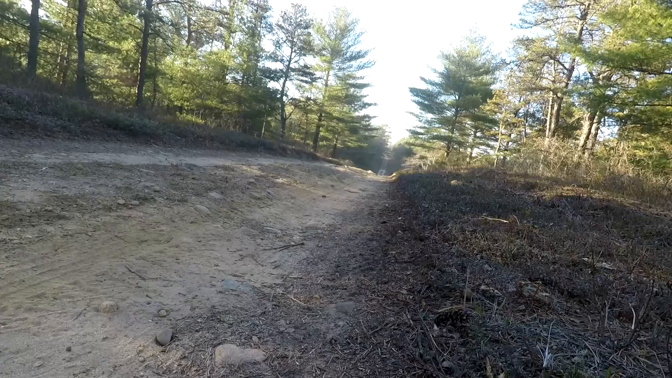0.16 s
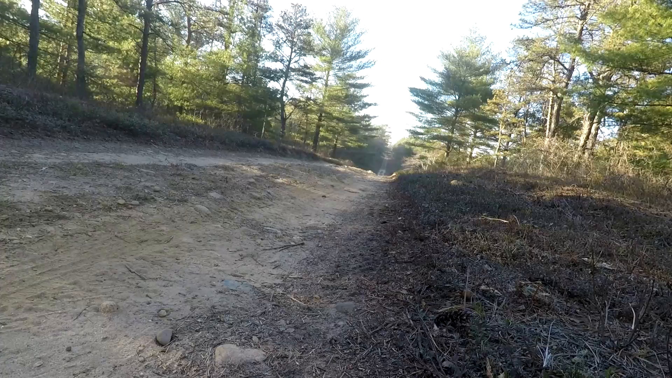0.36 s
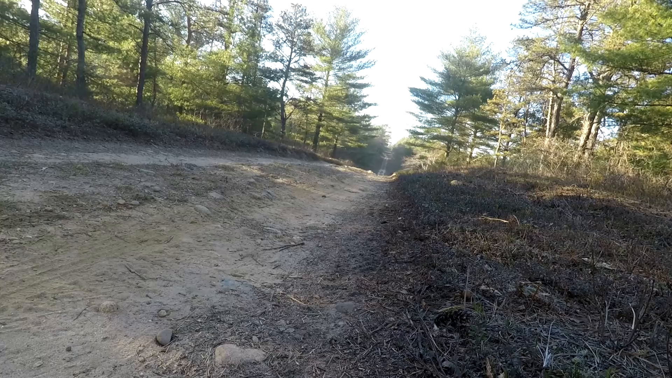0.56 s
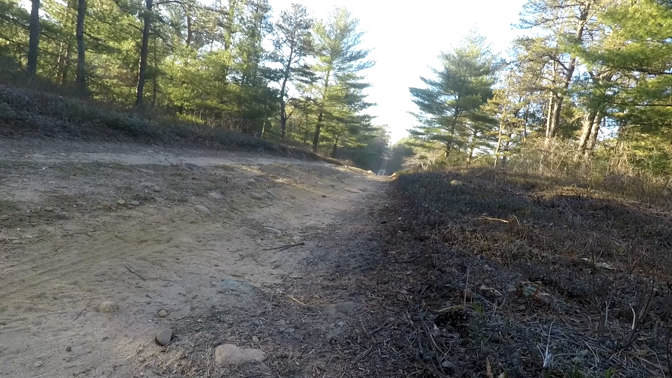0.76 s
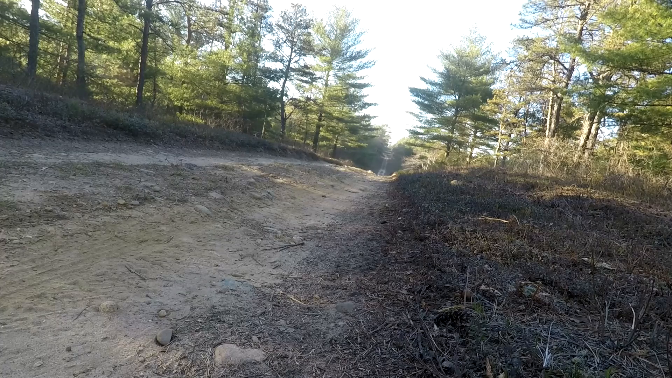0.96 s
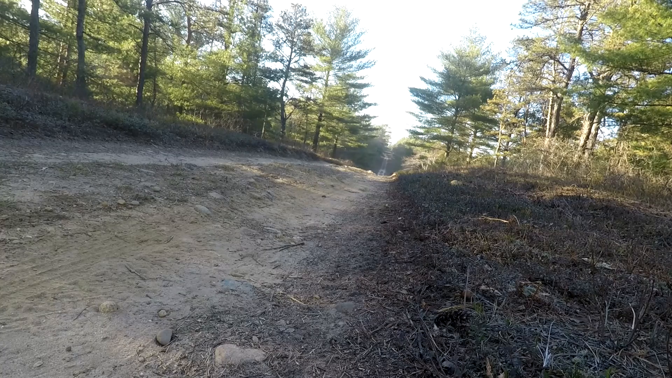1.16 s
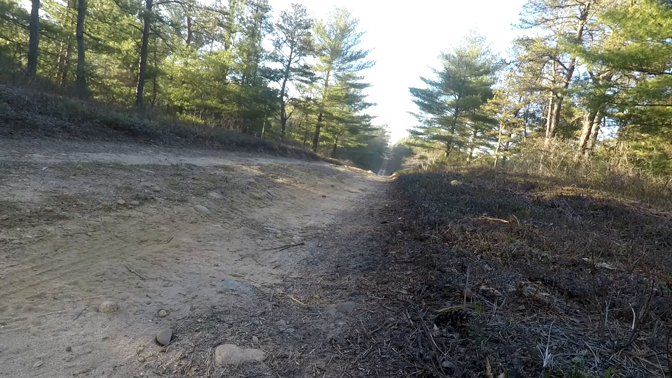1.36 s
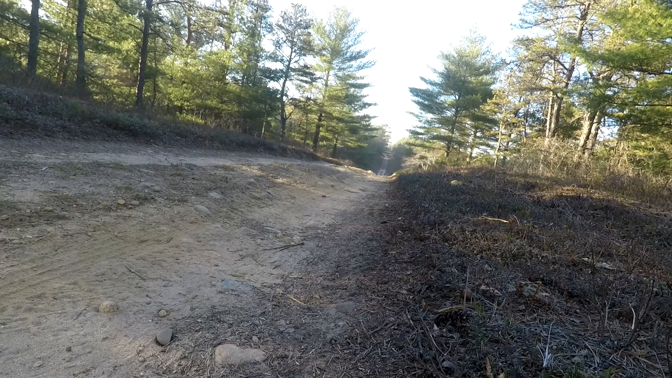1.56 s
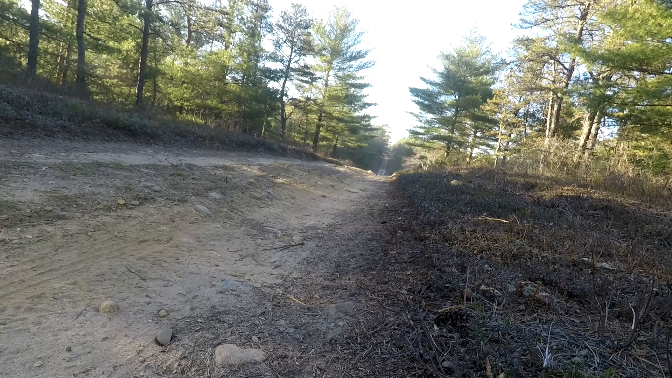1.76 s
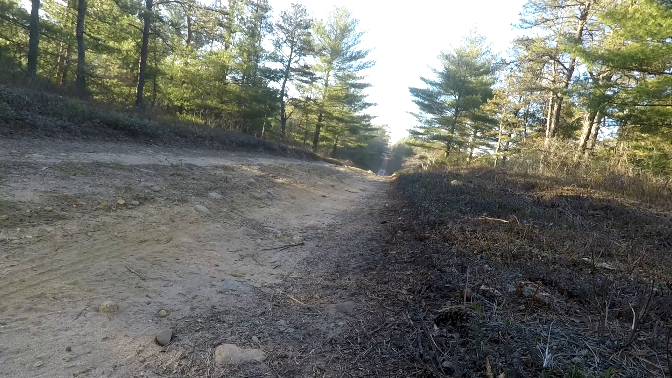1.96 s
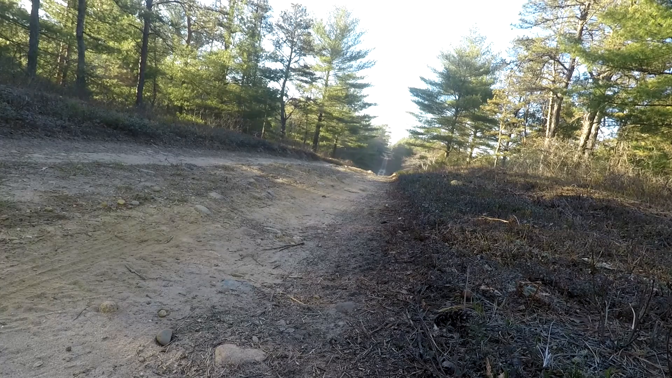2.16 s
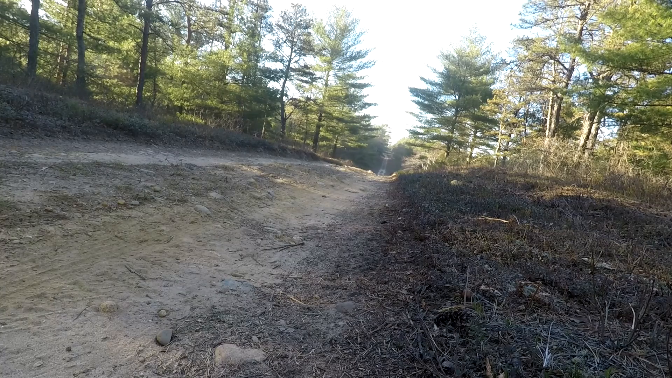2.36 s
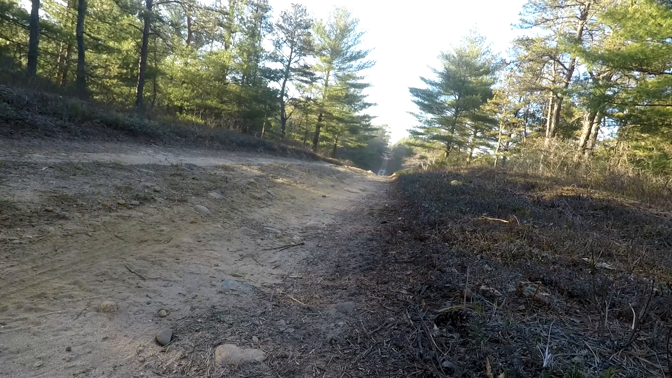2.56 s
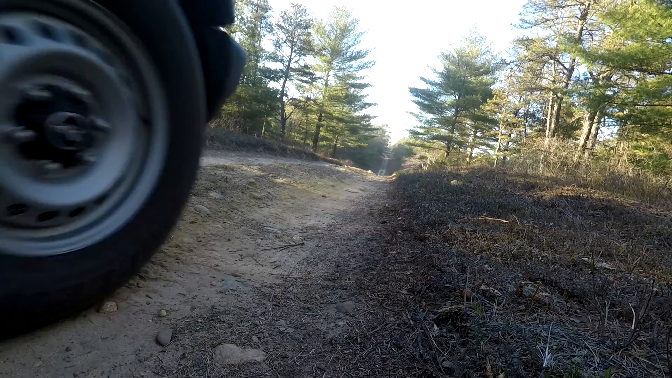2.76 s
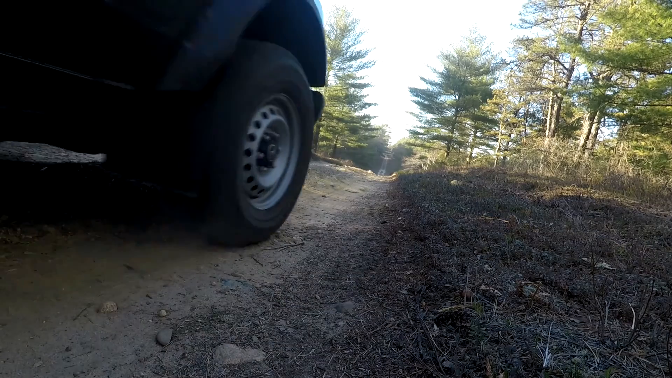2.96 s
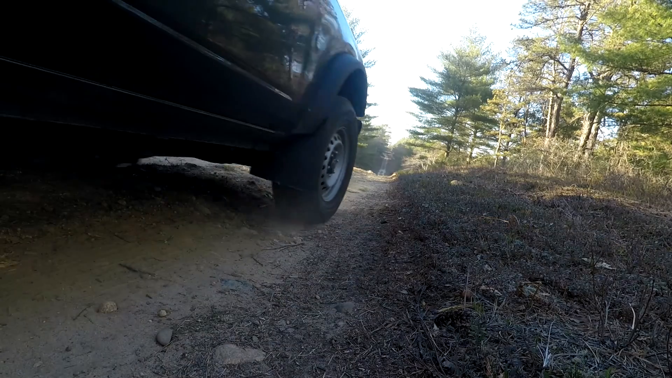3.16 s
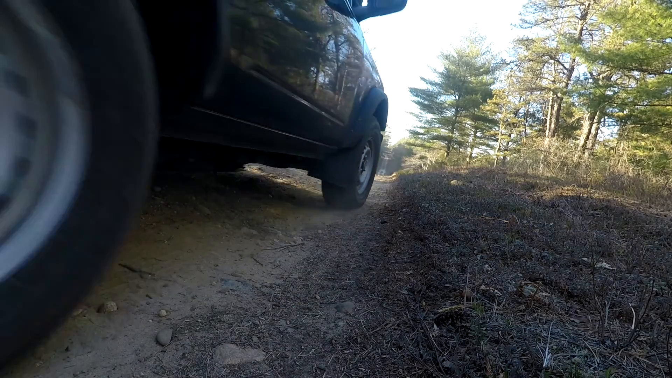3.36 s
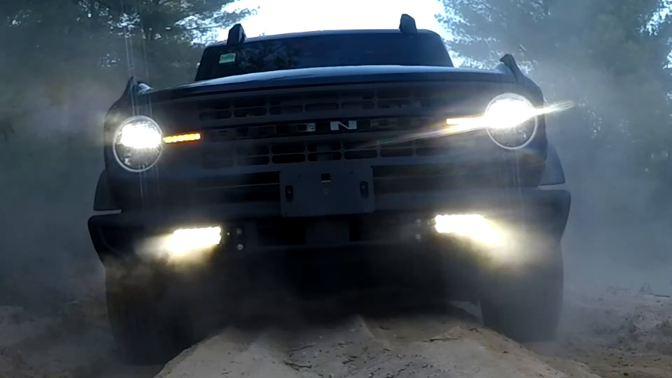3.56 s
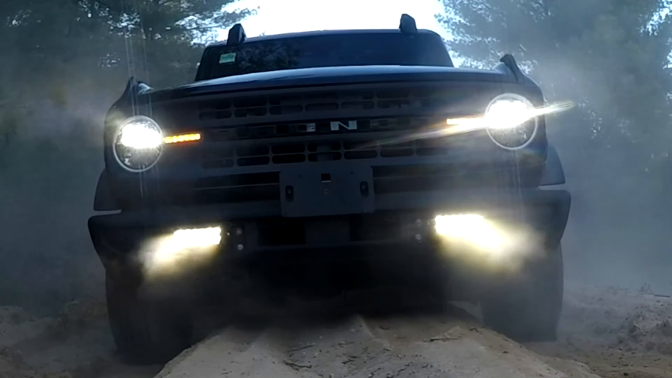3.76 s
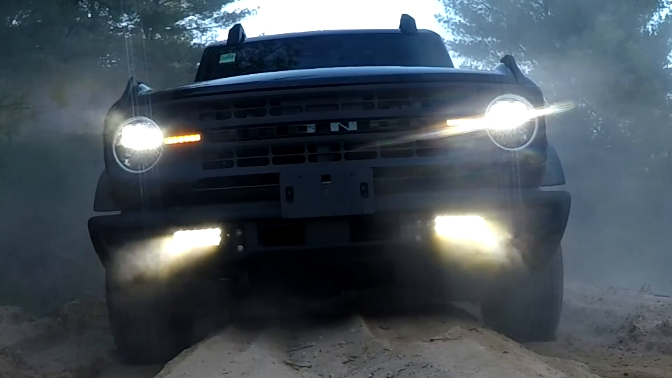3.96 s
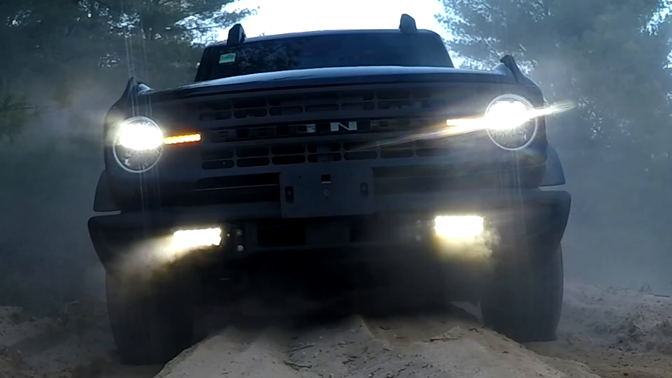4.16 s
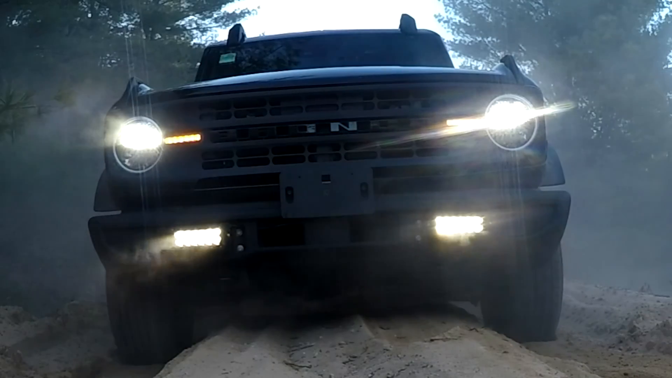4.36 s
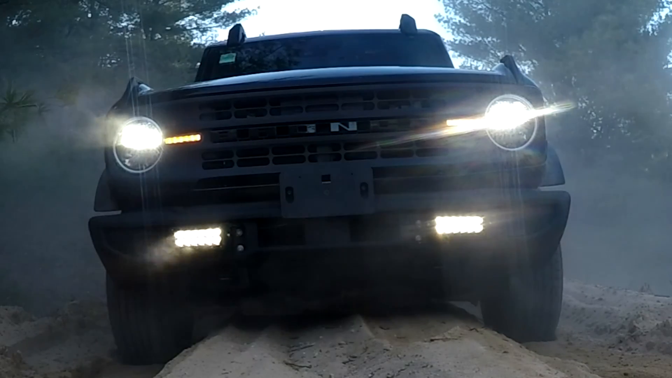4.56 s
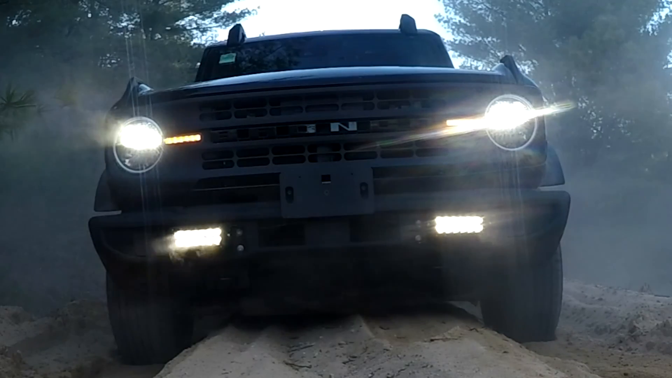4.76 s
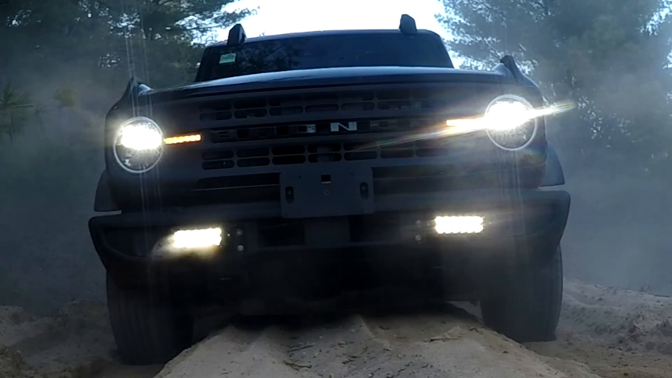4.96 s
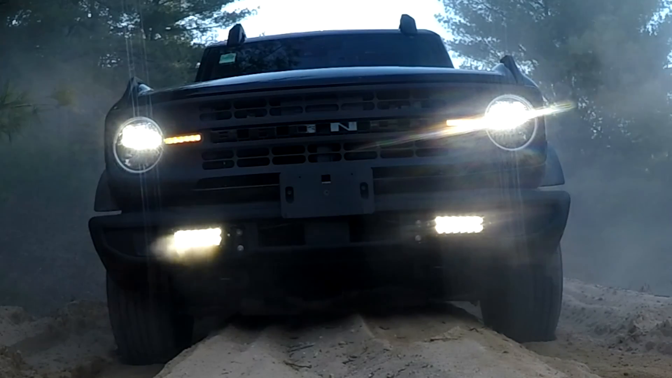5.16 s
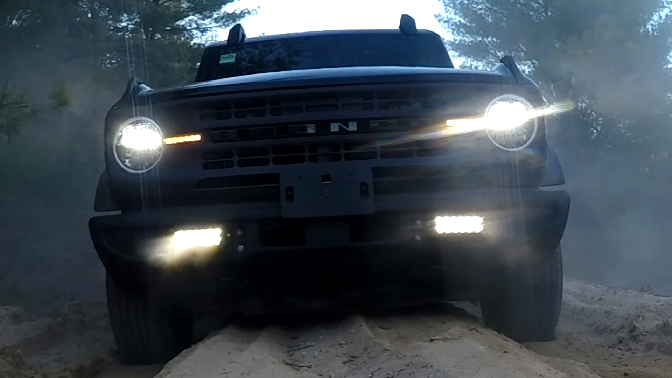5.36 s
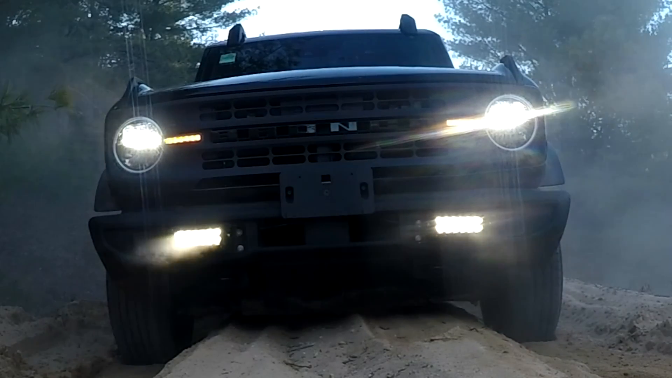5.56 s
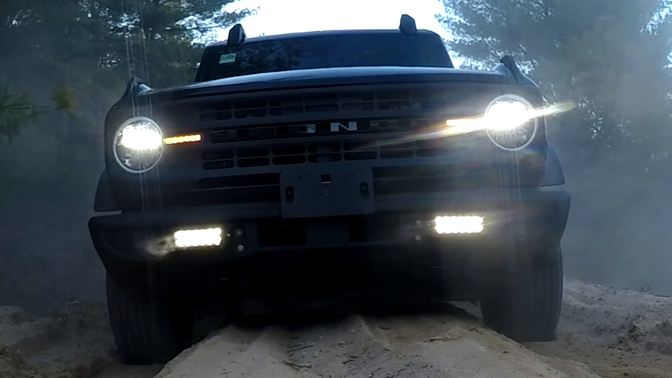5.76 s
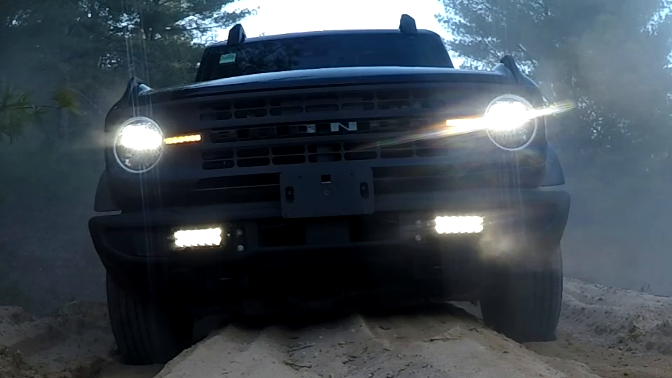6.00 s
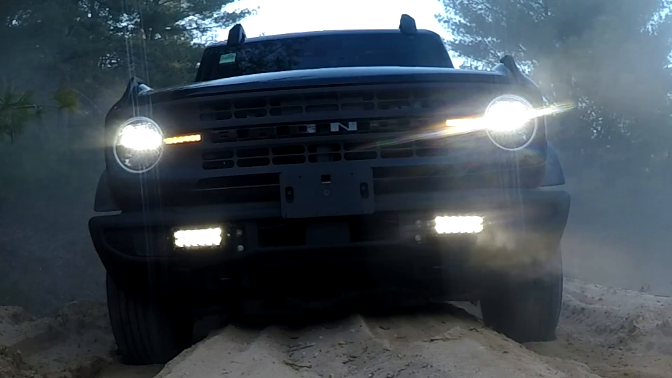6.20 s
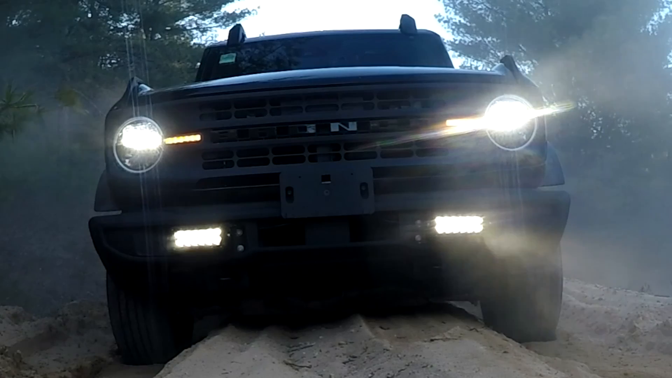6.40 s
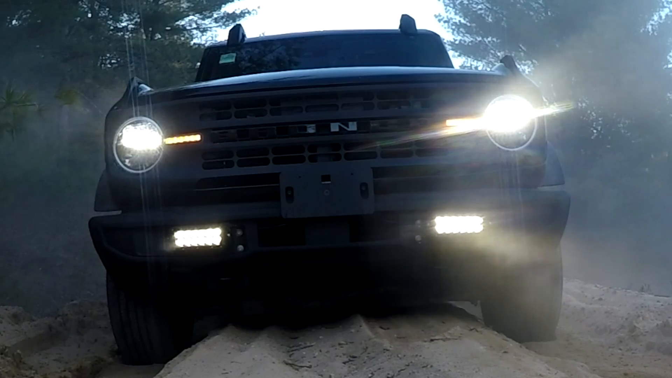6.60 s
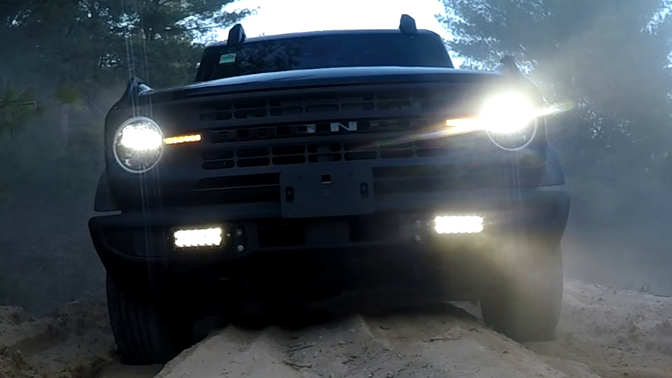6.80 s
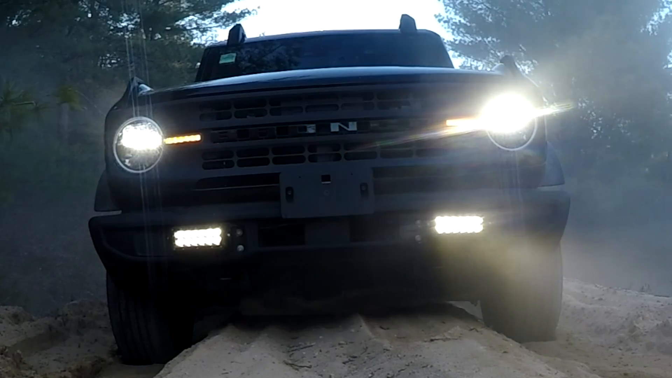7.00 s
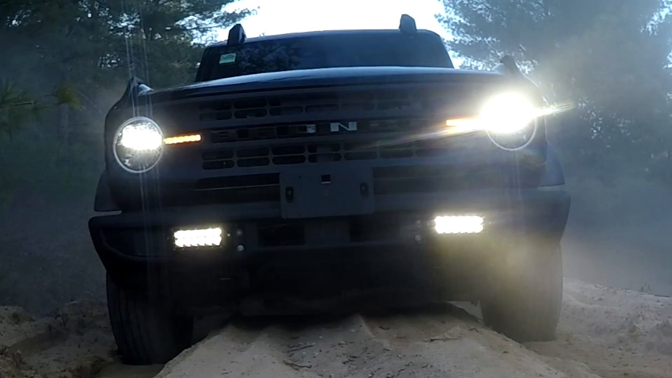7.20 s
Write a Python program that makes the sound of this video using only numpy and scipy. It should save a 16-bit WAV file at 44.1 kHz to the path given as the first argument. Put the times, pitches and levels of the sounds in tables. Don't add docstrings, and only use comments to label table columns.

```python
import sys
import numpy as np
from scipy import signal
from scipy.fft import rfft, irfft, next_fast_len
from scipy.io import wavfile
from scipy.ndimage import uniform_filter1d, map_coordinates

SR = 44100
rng = np.random.default_rng(int(sys.argv[2]) if len(sys.argv) > 2 else 0)


def ratio(d):
    e = np.asarray(d, float) / 20
    return 10 ** e


def wav_record(signal):
    frames = np.transpose(np.atleast_2d(signal))
    bounded = np.clip(frames, -1, 1)
    quanta = np.round(bounded * 32767).astype(np.int16)
    wavfile.write(sys.argv[1], SR, quanta)


N = 319239
THROTTLE_S, TAILPIPE_S, CHANGE_S = 1.16, 1.635, .04
RUSH_START_S, CUT_S = 1.594, 3.4590
DRIVE, IDLING = slice(0, round(CUT_S * SR) + 1), slice(round(CUT_S * SR), N)



def in_time(rows):
    s, *columns = np.transpose(rows)
    return [np.interp(np.arange(N) / SR, s, c) for c in columns]


def after(s, rise_s):
    return np.clip((np.arange(N) / SR - s) / rise_s, 0, 1)


def bump_db(s, half_s):
    return -8 * ((np.arange(N) / SR - s) / half_s) ** 2


def drift(rate):
    steps = rng.standard_normal(int(N / SR * 40) + 2)
    return np.interp(np.arange(N) / SR * np.clip(rate, .1, 39), np.arange(len(steps)), steps)


def delayed(x, lag):
    at = (np.arange(N) - lag * np.ones_like(x))[:, DRIVE]
    out = np.zeros((2, N))
    out[:, DRIVE] = [map_coordinates(c, [a], order=3, mode="nearest") for c, a in zip(x[:, DRIVE], at)]
    return out


def at_hz(ports, hz):
    table = np.array(ports)
    left_db, right_db, alike, lead = (np.interp(np.log(hz), np.log(table[:, 0]), c) for c in table.T[1:])
    outside = np.log2(np.maximum(1, np.maximum(table[0, 0] / hz, hz / table[-1, 0])))
    fall = ratio(-30 * outside)
    return fall * ratio(left_db) * np.exp(1j * lead), fall * ratio(right_db), np.clip(alike, 0, 1)


def at_ports(ports, gate=1, modes=()):
    size = next_fast_len(N)
    hz = np.maximum(np.arange(size // 2 + 1) * SR / size, 1)
    left, right, alike = at_hz(ports, hz)
    ring = ratio(sum(db / (1 + ((hz - centre) / width) ** 2) for centre, width, db in modes))
    shared, own = ring * rfft(gate * rng.standard_normal((2, N)), size)
    right_noise = alike * shared + np.sqrt(1 - alike ** 2) * own
    pair = irfft([left * shared, right * right_noise], size)[:, :N]
    return pair / np.sqrt(np.mean(pair.mean(0) ** 2))


def order(turns, hz, level_db, ports, span=DRIVE):
    left, right, _ = at_hz(ports, hz[span])
    scale = 2 / np.maximum(abs(left + right), 1.05 * (abs(left) + right))
    wave = np.sqrt(2) * ratio(level_db[span]) * scale * np.exp(2j * np.pi * turns[span])
    out = np.zeros((2, N))
    out[:, span] = (left * wave).real, (right * wave).real
    return out


# time in seconds, firing rate in Hz, exhaust pulse level in dB, exhaust turbulence level in dB.
ENGINE = [(0.0, 81.5, -54, -39.5), (0.3, 78.8, -38, -39.5), (0.75, 74.4, -39, -38.5),
          (1.0, 71, -33.5, -35.5), (1.155, 68.27, -42, -37.5), (1.19, 72.68, -26.5, -33.5),
          (1.3, 87.5, -18.5, -30), (1.44, 113.3, -14, -23.5), (1.56, 135.6, -11.5, -21),
          (1.63, 140.9, -16, -24), (1.7, 138.3, -15.5, -23), (1.96, 126.8, -15, -25.5),
          (2.29, 114.8, -10.5, -20.5), (2.62, 102.3, -11, -23), (2.95, 90.53, -11, -22),
          (3.28, 78.98, -12, -26), (3.46, 73.96, -11, -29)]


def engine_run():
    hz = in_time(ENGINE)[0]
    turns = np.cumsum(hz) / SR
    turns = turns - turns[round(CUT_S * SR)] + .08
    facing = after(TAILPIPE_S, CHANGE_S)
    load = after(THROTTLE_S, CHANGE_S) - facing
    coasting, pulling, overrun = .02, .05, .005
    rough = coasting + load * (pulling - coasting) + facing * (overrun - coasting)
    return hz, turns, load, facing, rough


# frequency in Hz, level in dB.
PIPE = [(150, -9.5), (198, -10.5), (222, -19.5), (236, -15.5), (251, -13), (268, -2), (300, -34.5),
        (355, -39), (400, -15.5), (455, -28.5), (530, -35), (700, -36)]


def pipe(hz):
    at, db = np.transpose(PIPE)
    return np.interp(np.log(hz), np.log(at), db)


def pipe_ring(hz):
    centre_hz, half_width_hz = 498.5, 9.1
    return 19.5 / (1 + ((hz - centre_hz) / half_width_hz) ** 2)


# frequency in Hz, level in dB.
PIPE_TURNED_AWAY = [(140, -6.5), (180, -6.5), (208, -16), (240, -10.5), (268, -5), (305, -9), (375, -11.5),
                    (430, -14.5), (700, -36)]
RUMBLE_PORTS = [(25, -24.5, -8, 0.75, 18), (55, -13.5, -11.5, 0.1, -2), (96, 3, 4, 0, 0.22),
                (170, -8.5, -4, 0.96, 0), (228, -17.5, -14.5, 1, 1.14), (249, -2.5, -11.5, 1, 1.34),
                (318, -8.5, -12.5, 1, 0.37), (364, -19, -11, 0.1, -1), (438, -19, -13.5, 1, -1.6),
                (642, -17.5, -13.5, 0.9, 1.83), (760, -19, -17, 0.97, 1.23), (1040, -24.5, -27, 0.05, 0.5),
                (1450, -35, -32, 1, 0)]


def firing_orders():
    t = np.arange(N) / SR
    hz, turns, load, facing, rough = engine_run()
    pulse_db = in_time(ENGINE)[1]
    burble_db = np.maximum(-6 - 17 * np.maximum(t - TAILPIPE_S, 0), -28)
    half_db = -28 + after(TAILPIPE_S - 2 * CHANGE_S, 2 * CHANGE_S) * (burble_db + 28)
    first_db = -7 - 19.5 * np.maximum(np.log2(hz / 100), 0)
    fifth_db = -32
    out = 0
    for k, lag in (1, 0), (1.5, .22), (2, .67), (3, .52), (5, 1.8):
        away_db = np.interp(k * hz, *np.transpose(PIPE_TURNED_AWAY))
        db = facing * pipe(k * hz) + (1 - facing) * away_db
        if k == 1:
            db = load * first_db
        elif k == 1.5:
            db = half_db
        elif k == 3:
            db = db - 5 * load
            lag = lag + .25 * np.tanh((k * hz - 254) / 18)
        elif k == 5:
            db = fifth_db + (1 - facing) * (db - fifth_db) + facing * pipe_ring(k * hz)
        level_db = pulse_db + db + 40 * rough * np.sqrt(k) + 0.7 * drift(25.9)
        out += order(k * (turns + rough * drift(35)) - lag, k * hz, level_db, RUMBLE_PORTS)
    return out


# multiple of the firing rate, level in dB.
BARK = [(.5, -11), (2.5, -5.5), (3.5, -4.5), (4, -1), (4.5, -3.5), (5.5, -15), (6, -2), (6.5, -13),
        (7, -7.5), (8, -5.5), (9, -6.5), (10, -18), (11, -4.5)]


def bark():
    hz, turns, load, facing, rough = engine_run()
    away_db, facing_db, pipe_share = -17, -11, 0.61
    bark_db = in_time(ENGINE)[1] + away_db + facing * (facing_db - away_db)
    out = 0
    for k, db in BARK:
        uneven = k * (turns + rough * drift(35)) + rng.random()
        tilt_db = -1.4 * load * abs(k - 4)
        level_db = db + bark_db + tilt_db + facing * pipe_share * pipe(k * hz) + 2.0 * drift(5.52)
        out += order(uneven, k * hz, level_db, RUMBLE_PORTS)
    return out


# multiple of the firing rate, time in seconds, half length in seconds, level in dB rms.
SWELLS = [(3, 2.05, .2, -31), (4, 1.87, 0.2, -37.5), (6.5, 2.04, 0.14, -35), (7, 1.8, 0.16, -38),
          (5, 2.15, 0.13, -33), (3.5, 2.19, .3, -32.5), (3.5, 3.045, 0.14, -23.5), (4, 3.14, 0.24, -34.5),
          (9.5, 2.05, 0.17, -41), (10.5, 2.12, .12, -44), (7.5, 1.97, 0.093, -45), (8, 3.1, .25, -38),
          (2, 1.92, 0.17, -30.5), (7, 3.4, 0.093, -39), (6, 3.0, .15, -50), (5, 2.4, 0.17, -41),
          (11.5, 2.6, .2, -40), (2, 1.27, 0.11, -25), (5, 1.22, .04, -32.5), (3, 1.36, 0.031, -27.5),
          (3, 1.465, 0.025, -21), (4, 1.3, .04, -28.5), (3, 1.57, 0.075, -32)]


def swells():
    hz, turns, *_ = engine_run()
    out = 0
    for k, s, half_s, db in SWELLS:
        level_db = db + bump_db(s, half_s) + 1.0 * drift(12)
        out += order(k * turns + rng.random(), k * hz, level_db, RUMBLE_PORTS)
    return out


RUMBLE_MODES = [(105, 78, -11.5), (457, 9.2, 3.5), (262, 10, 3.5), (398, 61, -3.5), (606, 100, -3.5)]
FAR_PORTS = [(25, -20, -15, 0.62, 10), (55, 3, -15, 0.29, -8.5), (106, -7, -3, 0.45, -1),
             (170, -3, 1, 0.63, -1), (219, 0.5, 6, 0.54, 1.16), (270, 3, 0, 1, 0),
             (312.7, 9.5, -11.5, 0.96, 1.5), (339, -28, 3, 0.81, -1), (485, -8.5, -6, 1, -0.5),
             (660, -10.5, -6.5, 1, 2.2), (864, -12, -16, 0.81, 0.5), (1080, -13.5, -16, 0.91, 0.87),
             (1470, -21.5, -22, 0.32, 0.6)]


def exhaust_turbulence():
    puff = 1 + 0.1 * np.cos(2 * np.pi * engine_run()[1])
    near = after(1.252, 0.48)
    rumble = near * at_ports(RUMBLE_PORTS, puff, RUMBLE_MODES)
    rumble += np.sqrt(1 - near ** 2) * ratio(3.0) * at_ports(FAR_PORTS, puff)
    return ratio(in_time(ENGINE)[2] + 1.56 * drift(12)) * rumble


# time in seconds, level in dB, half length in seconds.
GUSTS = [(.45, -43.5, 0.2), (1.05, -35, 0.21), (1.69, -38.5, 0.28), (2.663, -34, 0.21), (3.38, -25.5, 0.34)]
BUFFET_PORTS = [(17.9, -17, -10, 0.56, 0.), (30, 3, -3, .5, 0.), (60, 2, 0, 0.4, 0.014)]


def wind_buffeting():
    t = np.arange(N) / SR
    wind = ratio(-56) + sum(ratio(db) * np.exp(-((t - s) / half_s) ** 2) for s, db, half_s in GUSTS)
    return wind * ratio(2.5 * drift(7.9)) * at_ports(BUFFET_PORTS)


BODY_PORTS = [(840, 1.5, -17, 0.92, 0.72), (1380, -10, -8, 0.66, 0.58), (2400, -7, -11.5, 0.6, 0.55),
              (3600, -9.5, -11.5, 0.97, 0.24), (5070, -16, -13.5, 0.78, 0.65), (6100, -8, -8.5, 0.61, 0.97),
              (6300, -22, -9, 0.64, 1.3), (7700, -10.5, -13, 0.49, 2.2), (8150, -24, -19.5, 0.73, 1.9),
              (9900, -20.5, -17, 0.63, 1.9), (11000, -26, -46, 0.07, 0.98), (12100, -36, -23.5, 0.16, 3.0),
              (13500, -41, -39, 0.22, 3.2)]
BODY_MODES = [(3260, 28, 5), (4670, 27, 7), (2680, 140, -3), (1930, 190, -4.5), (11600, 1300, -1.5)]


def octaves_of_revs():
    return after(THROTTLE_S, CHANGE_S) * np.maximum(np.log2(in_time(ENGINE)[0] / 72), 0)


def clatter():
    body = ratio(-45.5 + 0.25 * drift(21.6)) * at_ports(BODY_PORTS, modes=BODY_MODES)
    dull = signal.sosfiltfilt(signal.butter(6, 9500, fs=SR, output="sos"), body)
    boost_db = 9.5 * octaves_of_revs() + 3.5 * after(THROTTLE_S, CHANGE_S)
    return body + (ratio(boost_db) - 1) * dull


WHISTLE_PORTS = [(2800, 0.0038, 0, .9, .3), (2950, 0, -2, .9, .3)]


def belt_whistle():
    t = np.arange(N) / SR
    settles_s = .42
    hz = 2880 - 50 * np.minimum(t, settles_s)
    wavering = np.cumsum(hz + 22 * drift(35.6)) / SR
    level_db = -58 - 70 * np.maximum(t - settles_s, 0) + 2.5 * drift(39)
    return order(wavering, hz, level_db, WHISTLE_PORTS)


INTAKE_PORTS = [(1300, -10, -12, .8, .7), (1600, -6, -8, .85, .6), (1780, 0, -3, .85, .6),
                (2100, -4, -8, .8, .5), (2700, -10, -14, .8, .4)]
INTAKE_MODES = [(1800, 30, -3), (2200, 70, 4)]


def intake_howl():
    howl_db = np.minimum(-50.5 + 17.5 * octaves_of_revs(), -34.5)
    return ratio(howl_db) * after(0.49, 0.52) * at_ports(INTAKE_PORTS, modes=INTAKE_MODES)


# start in seconds, peak level in dB, pitch in Hz, 60 dB decay time in seconds.
KNOCKS = [(0.906, -20, 160, 0.11), (1.178, -12, 240, 0.019), (1.192, -9, 224, 0.022),
          (1.195, -25, 7160, 0.013), (1.204, -23, 170, 0.028), (1.22, -15.5, 228, 0.043),
          (1.349, -11, 290, .012), (1.389, -16, 280, .012), (1.563, -6, 300, .012), (1.654, -5, 60, 0.056),
          (3.178, -18, 648, 0.097), (3.252, -21, 650, .05), (3.409, -27, 302, 0.068),
          (3.651, -23.5, 72.4, 0.096), (3.834, -33, 237, 0.095), (3.845, -34, 310, .1),
          (3.849, -37, 122, 0.12), (4.08, -32.5, 126, 0.099)]


def knocks():
    out, t = np.zeros(N), np.arange(N) / SR
    for s, db, hz, t60 in KNOCKS:
        since = np.maximum(t - s, 0)
        attack = np.minimum(since / 0.0014, 1)
        out += ratio(db - 60 * since / t60) * attack * np.sin(2 * np.pi * hz * since)
    return out


AIRBOX_PORTS = [(1705, -2, -11, 1, .6), (1750, -2, -5, 0.98, .6)]


def spooling():
    peak_s, half_s = 1.4, 0.1
    hz = np.maximum(2150 + 2200 * (np.arange(N) / SR - peak_s), 100)
    whine_db = -48 + bump_db(peak_s, half_s) + 3 * drift(30)
    whine = order(np.cumsum(hz + 50 * drift(39)) / SR, hz, whine_db, INTAKE_PORTS)
    start_s, length_s = 1.27, 0.15
    singing = after(start_s, .02) - after(start_s + length_s, 0.061)
    return whine + ratio(-48) * singing * at_ports(AIRBOX_PORTS, modes=[(1735, 25, 16)])


# time in seconds, nearness as roar level in dB, bearing as left minus right in dB.
PASSING = [(1.605, -27.5, 1.5), (1.787, -27, 0.5), (2.257, -27.5, 6), (2.565, -26, 3.5), (2.927, -30, 6),
           (3.44, -41, 0)]
# pitch in Hz, half width in Hz, level in dB re roar, time in seconds, half length in seconds.
STREAKS = [(3580, 54, -15, 2.29, .3), (3350, 110, -5.5, 2, 0.11), (2783, 60, -12, 1.9, 0.15),
           (3280, 50, -6, 1.78, .07), (5700, 80, -14.5, 2, 0.56)]
ROAR_PORTS = [(958, 2, -2, 0.93, 1.15), (1140, -1.5, -8.5, 0.25, -0.47), (1400, -2, -9, 0.81, 1.5),
              (1930, -6.5, -9, 1, 1), (2690, -7.5, -14, 0.17, 1.1), (2780, -5, -33, 0.42, -0.6),
              (3100, -13, -12, 0.91, 1.9), (3470, -8.5, -10, 0.81, -0.22), (4350, -14.5, -14.5, 0.97, 0.96),
              (4800, -12.5, -23, 0.99, .8)]
ROAR_MODES = [(1620, 66, 1.8), (3000, 15, 5.2), (3450, 69, 2.5)]
HISS_PORTS = [(4500, -9, -9, .85, .8), (5150, -5, -5, .85, 1.4), (5650, 1, 0, .85, 1.5),
              (6400, -1, -1, .8, 1.9), (7150, 0, 1, .9, 2.3), (7750, -1, 0, .85, 2.5),
              (9000, 0, 0, .7, 2.8), (9800, -1, -1, .7, 2.8), (10500, -5, -5, .7, 2.8),
              (11300, -11, -11, .6, 3), (12200, -10, -12, .6, 3.3), (13200, -13, -17, .5, 3.3),
              (14300, -35, -42, .3, 3.3)]
HISS_MODES = [(5000, 300, -5.5), (5560, 200, -2), (6560, 300, -3), (7100, 300, -2), (8300, 300, -2.5),
              (10900, 500, -3.5), (12400, 600, -1)]
BLOW_OFF_PORTS = [(2270, 0, -7, .6, .4), (3240, 3, -1, .9, .1), (4200, -7, -8, .85, .4),
                  (4700, -10, -10, .8, .9), (5900, -9, -9, .8, 1.6), (7440, -2, -1, .9, 2.5),
                  (8400, -14, -13, .8, 2.9)]


def air_rush():
    since = np.arange(N) / SR - RUSH_START_S
    roar_db, pan_db = in_time(PASSING)
    flutter = drift(20.15)
    roar = ratio(roar_db + 0.17 * flutter + pan_db * [[.5], [-.5]]) * at_ports(ROAR_PORTS, modes=ROAR_MODES)

    hiss_db = roar_db + 3.5 - 13 * (1 - np.exp(-np.maximum(since, 0) / 0.9))
    hiss_ports = HISS_PORTS[:6] + [(8300, -8, -7, .8, 2.7), (9000, -20, -19, .7, 2.8)]
    hiss = ratio(hiss_db + 0.55 * flutter + 0.8 * drift(30.43)) * at_ports(hiss_ports, modes=HISS_MODES)

    sizzle_db = -46.5 + 2 * np.minimum(roar_db - PASSING[2][1], 0) - 5.2 * (1 - after(1.74, 0.21))
    sizzle_ports = [(8300, -8, -8, .7, 2.7)] + HISS_PORTS[6:]
    sizzle = ratio(sizzle_db + 1.5 * drift(12)) * at_ports(sizzle_ports, modes=HISS_MODES)

    vented = ratio(-27 - 10 * since + 0.27 * drift(15.0)) * at_ports(BLOW_OFF_PORTS)

    streak = 0
    for hz, width, db, s, half_s in STREAKS:
        breath = ratio(roar_db + db + bump_db(s, half_s) + 4.5 * drift(30))
        ports = [(hz - width, 0, -4, .9, .1), (hz + width, 0, -4, .9, .1)]
        streak += breath * at_ports(ports, modes=[(hz, width, 8)])

    rush = delayed(streak + roar + hiss + sizzle + vented, -.2 * pan_db * [[1], [0]])
    bounce = SR * (.0030 - 0.000578 * since + 0.00034 * drift(4))
    rush += 0.39 * delayed(rush, bounce)
    return signal.sosfilt(signal.butter(10, 13600, fs=SR, output="sos"), rush)


# time in seconds, firing rate in Hz.
IDLE = [(3.7, 27.9), (4.2, 28.55), (5.15, 28.7), (5.5, 28.3), (6.4, 28.2), (7.0, 28.9)]
# multiple of the firing rate, level in dB rms, lead in turns.
IDLE_ORDERS = [(1, -36.5, -.32), (2, -55, -.44), (3, -45.5, -.21), (4, -61, .1), (5, -55, .32),
               (6, -58, .6), (8, -56, .2), (10, -57, .8)]
IDLE_LOW_PORTS = [(20, -1, 0, 0.98, 0.1), (45, -11, -9, 0.79, 0.0), (110, -16, -16, 0.65, 0.2),
                  (190, -22, -19, 0.59, 0.6), (260, -16, -21, 0.77, 0.4), (330, -20, -22, 0.72, 0.2),
                  (430, -23, -24, 0.56, 0.0), (520, -29, -27, 0.14, 2.8), (700, -28, -29, 0.72, 3.2),
                  (1000, -31, -30, 0.58, 3.5), (1350, -35, -31, 0.02, 3.0)]
IDLE_BAY_PORTS = [(1350, -9, -5, 0.02, 3.0), (1700, -1, -1, 0.9, 0.6), (2100, -6, -12, 0.47, 0.4),
                  (2600, -13, -14, 0.41, -1.0), (3300, -17, -14, 0.6, -0.4), (3700, -13, -10, 0.87, -0.1),
                  (4800, -20, -20, 0.6, -0.2), (5800, -16, -19, 0.54, -0.1), (6600, -19, -17, 0.42, -1.1),
                  (7200, -19, -17, 0.39, -1.3), (8000, -25, -21, 0.05, -2.9), (9600, -24, -19, 0.28, 0.1),
                  (11500, -31, -29, 0.11, 0.1), (14000, -43, -44, 0.12, -0.1)]
IDLE_MODES = [(1695, 19, 3), (1440, 16, 2), (2060, 20, 1), (3050, 55, 4.5), (1270, 48, -20), (3690, 47, 3),
              (4390, 270, 4), (4800, 150, -2), (7240, 430, 2), (9500, 390, 1.5), (13200, 940, 7.5)]


def idle_engine(hz, turns):
    out = 0
    for k, db, lead in IDLE_ORDERS:
        level_db = db + 0.14 * k * drift(4.6)
        out += order(k * turns + lead, k * hz, level_db, IDLE_LOW_PORTS, IDLING)
    puff = 1 + 0.1 * np.cos(2 * np.pi * turns - 2.5)
    low_modes = [(27.4, 4.9, -11), (84, 9.1, 4.0), (914, 30, 4.5), (1240, 13, 3.0)]
    out += ratio(-39.5 + 0.94 * drift(8.5)) * at_ports(IDLE_LOW_PORTS, puff, low_modes)
    throb = 1 + 0.12 * np.cos(2 * np.pi * turns)
    return out + ratio(-49.5 + 0.62 * drift(16)) * at_ports(IDLE_BAY_PORTS, throb, IDLE_MODES)


TICK_BY_CYLINDER_DB = [-3, 4, 0.5, -1]
TICK_PORTS = [(5100, -10, -11, .6, 0), (5600, 0, -3, .5, 0), (6000, 0, -3, .5, 0), (6600, -8, -7, .5, -1),
              (7500, -10, -8, .4, -1.3)]
TAPPET_PORTS = [(1620, -5, -6, 0.98, .6), (1730, 0, 0, 1, 0.51), (1800, -8, -10, 0.73, 0.45)]


def injectors_and_tappets(turns):
    turns = turns + .31
    stroke = turns.astype(int)
    strokes = stroke[-1] + 1
    hard = rng.uniform(-0.53, 1, strokes)[stroke]
    strength_db = 3.5 * hard - .5 + np.take(TICK_BY_CYLINDER_DB, stroke % 4)
    burst = ratio(strength_db) * np.exp(-(((turns % 1) - .5) / .09) ** 2)
    ring_hz = 5800 + 90 * rng.standard_normal(strokes)[stroke]
    out = burst * order(np.cumsum(ring_hz) / SR, ring_hz, np.full(N, -57.5), IDLE_BAY_PORTS, IDLING)
    out += ratio(-67) * at_ports(TICK_PORTS, burst)
    uneven = ratio(3 * rng.standard_normal(strokes)[stroke])
    tap = uneven * np.exp(-(((turns + 0.31) % 1 - .5) / 0.17) ** 2)
    return out + ratio(-60) * at_ports(TAPPET_PORTS, tap)


def idling():
    hz = in_time(IDLE)[0]
    turns = np.cumsum(hz) / SR
    return idle_engine(hz, turns) + injectors_and_tappets(turns)


def scene():
    before = np.arange(N) / SR < CUT_S
    lifted = after(RUSH_START_S, 0.017)
    drive = firing_orders() + bark() + swells() + exhaust_turbulence() + wind_buffeting()
    drive += (1 - lifted) * (clatter() + intake_howl()) + belt_whistle()
    drive += spooling() + lifted * air_rush()
    return before * drive + after(3.481, .012) * idling() + knocks()


# start in seconds, end in seconds, low edge in Hz, high edge in Hz, share of time dropped 0-1.
STARVED = [(1.3, 1.585, 9800, 11400, .9), (1.3, 1.47, 11400, 14300, 1), (1.47, 1.585, 11400, 13000, .5),
           (1.47, 1.62, 13000, 14300, 1), (1.62, 1.83, 9800, 11600, 1), (1.62, 1.86, 11600, 12500, .2),
           (1.62, 1.8, 12500, 14300, 1), (1.8, 2.0, 13300, 14300, .7), (2.0, 2.7, 13700, 14300, .45),
           (1.3, 3.3, 14300, 22000, 1), (1.8, 1.88, 8200, 8800, .8), (2.55, 2.65, 8200, 8800, 1),
           (1.9, 2.95, 8200, 9900, .2), (1.83, 2.95, 9900, 11000, .4), (1.83, 2.95, 11000, 12000, .6),
           (2.0, 2.95, 12000, 13600, .25), (2.7, 3.28, 13400, 14300, .9), (2.95, 3.3, 12500, 13400, .85)]


def treble_dropouts(x):
    band_hz, hold = 550, 2048
    part = x[:, DRIVE]
    size = next_fast_len(part.shape[1])
    bins, hz, at = rfft(part, size), np.arange(size // 2 + 1) * SR / size, np.arange(part.shape[1])
    out = x.copy()
    for start, end, bottom, top, share in STARVED:
        step = band_hz if share < 1 else top
        for low in np.arange(bottom, top, step):
            chosen = (rng.random(N // hold + 1) < share)[at // hold]
            dropped = chosen * (at > start * SR) * (at < end * SR)
            high = min(low + band_hz, top) if share < 1 else top
            band = (hz >= low) * (hz < high)
            gate = uniform_filter1d(1. * dropped, size=256)
            out[:, DRIVE] -= gate * irfft(bins * band, size)[:, :len(at)]
    return out


def roll_off(x):
    return signal.sosfilt(signal.butter(12, 15850, fs=SR, output="sos"), x)


def record(dry):
    rounded = 1.3 * np.tanh(dry / 1.3)
    return roll_off(treble_dropouts(rounded))


dry = scene()
out = record(dry)
wav_record(out)
```